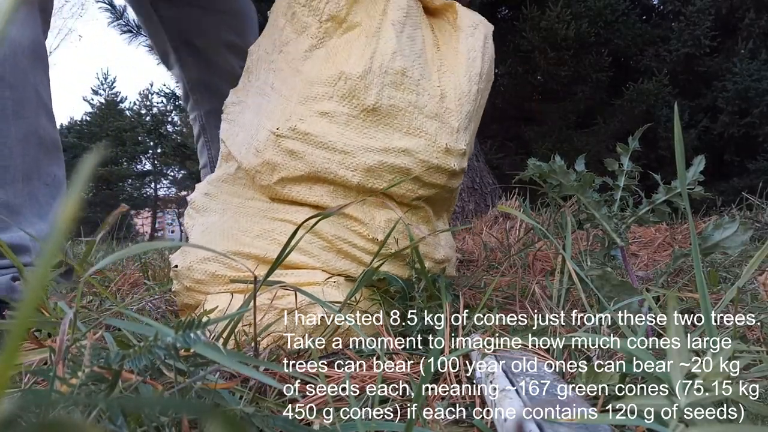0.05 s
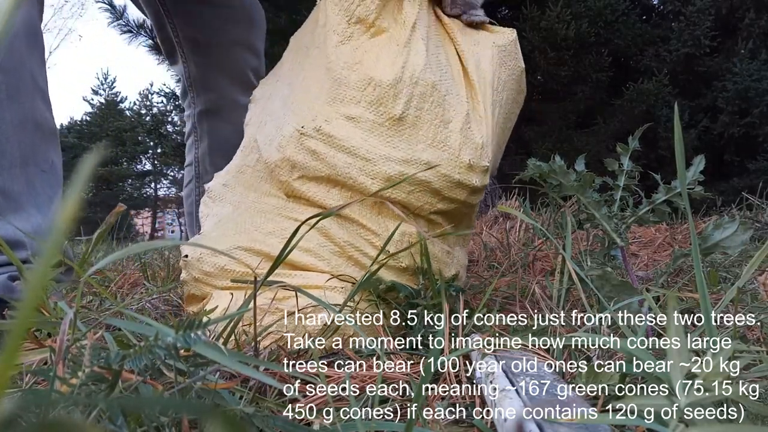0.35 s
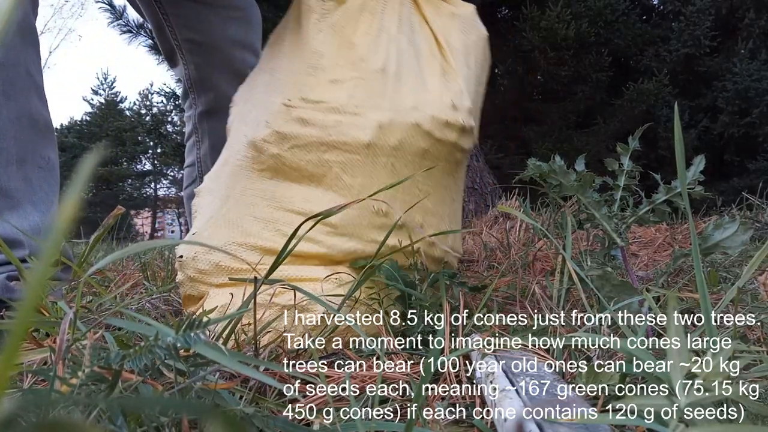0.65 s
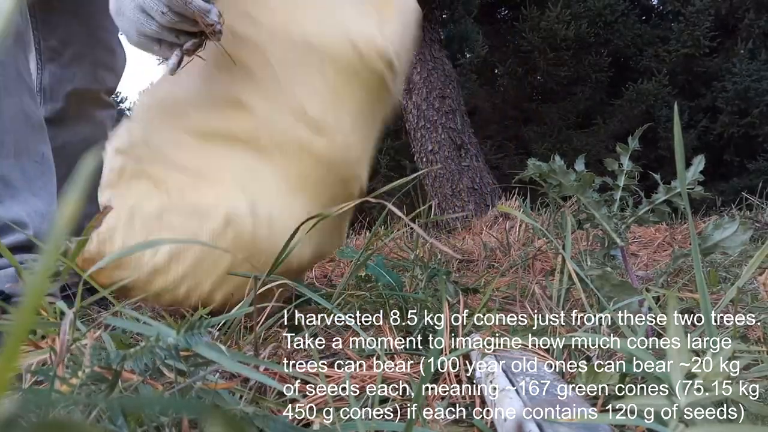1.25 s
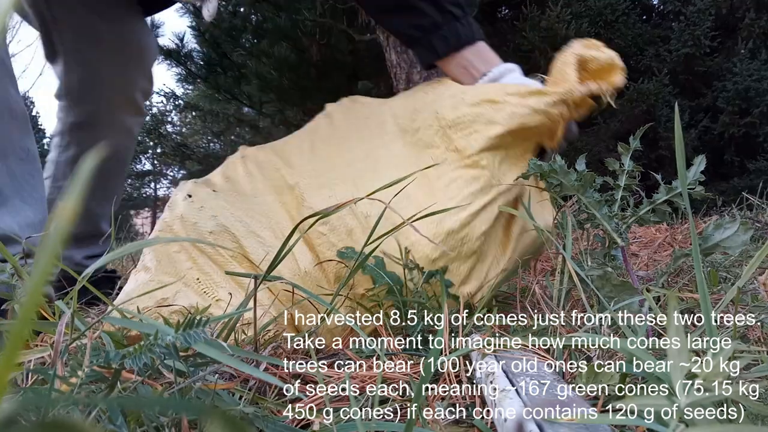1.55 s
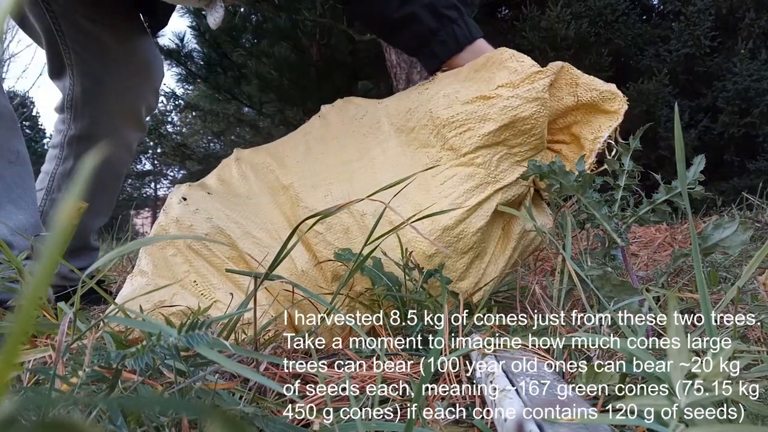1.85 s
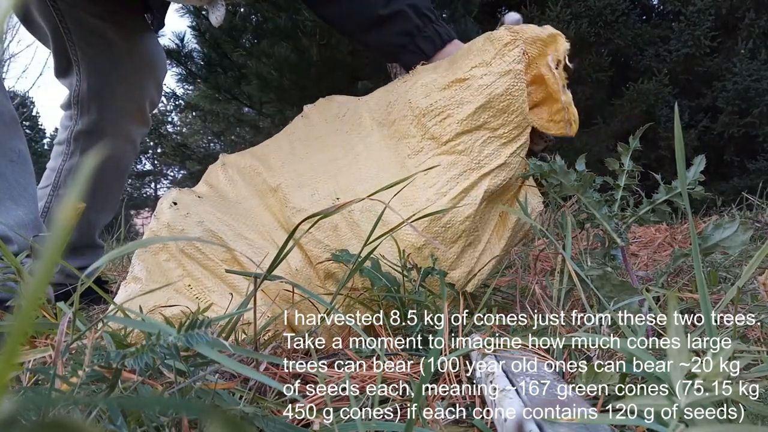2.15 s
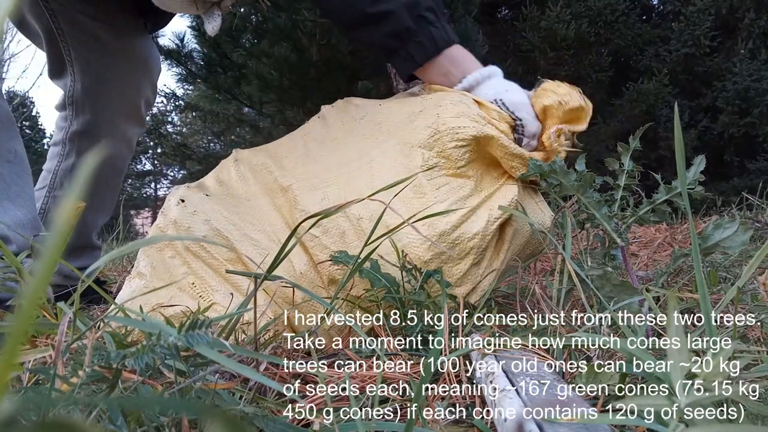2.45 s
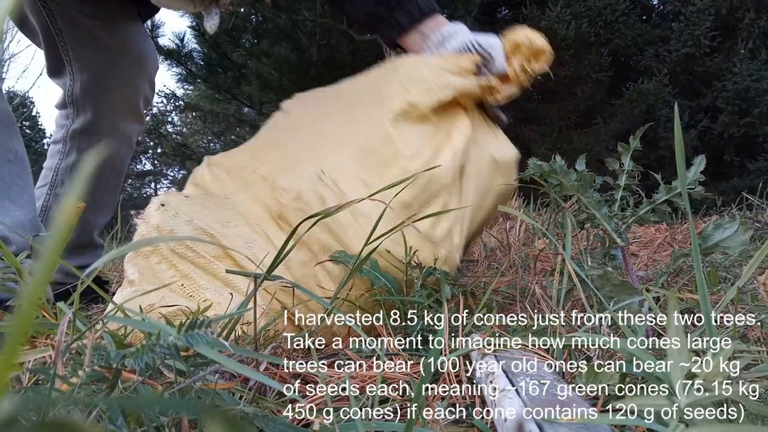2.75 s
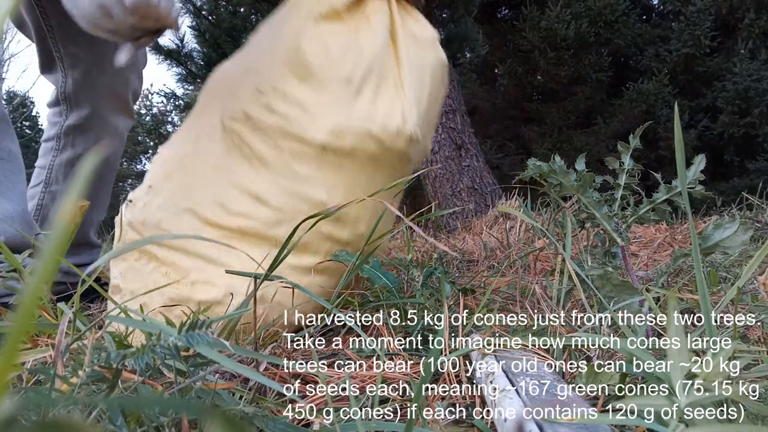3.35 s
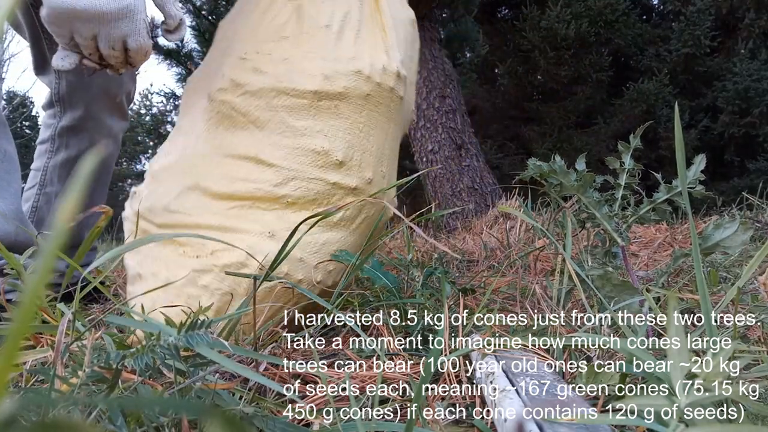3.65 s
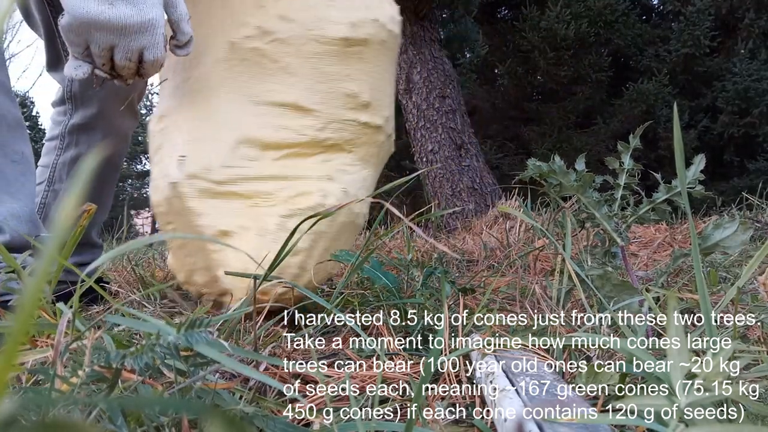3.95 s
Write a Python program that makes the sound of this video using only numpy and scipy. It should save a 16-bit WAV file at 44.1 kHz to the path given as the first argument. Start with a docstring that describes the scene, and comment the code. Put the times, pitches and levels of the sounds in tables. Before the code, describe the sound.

Close, uneven rustling of a coarse sack being hauled about outdoors, its stiff folds snapping. The cones inside grind and knock as it rises, lands softly on the turf, then is handled and heaved up once more.

```python
"""A woven sack full of conifer cones is hauled up, dropped on the grass and hauled up again, close by.
Stick-slip friction makes the weave rasp and scrape, and its folds crinkle and snap as they buckle.
Inside, the cones grind, crunch at each heave and knock together in heavily damped impacts.
The load thuds softly on the turf; a short scatter and faint outdoor air lie underneath."""
import sys
import numpy as np
from scipy import signal
from scipy.fft import rfft, irfft
from scipy.io import wavfile

SR = 44100
rng = np.random.default_rng(int(sys.argv[2]) if len(sys.argv) > 2 else 0)


def transcribe(u):
    """Save the signal u as a 16-bit wav file named by the first command-line argument.

    u: samples, shape (n,) or (channels, n), limited to [-1, 1]; the rate is SR.
    q: integer samples, one column per channel.
    """
    v = np.clip(np.atleast_2d(u).T, -1, 1)
    q = np.round(v * 32767).astype(np.int16)
    wavfile.write(sys.argv[1], SR, q)


N = 176400

# Cloth rubbing, cloth scraping over cones and grass, and cones shifting inside.
# Each row: time in seconds, relative level in dB.
RUBBING = [(0, -42), (.37, -42.5), (.41, -45.5), (.445, -39), (.52, -46), (.57, -48.5), (.62, -42),
           (.79, -40.5), (.9, -44.5), (.98, -43), (1.1, -54), (1.2, -53), (1.25, -55), (1.34, -47.5),
           (1.45, -43), (1.58, -46), (1.69, -43.5), (1.83, -45), (1.88, -51.5), (1.92, -45.5), (2.0, -56),
           (2.06, -43.5), (2.17, -49.5), (2.36, -57.5), (2.44, -37), (2.48, -44.5), (2.53, -39.5),
           (2.565, -48), (2.63, -42), (2.73, -46.5), (2.83, -45), (2.97, -43), (3.12, -56), (3.19, -51),
           (3.24, -59), (3.38, -43.5), (3.47, -41.5), (3.57, -39), (3.62, -58), (3.66, -49.5), (3.76, -51),
           (3.84, -42.5), (3.92, -46.5), (4, -53.5)]
SCRAPING = [(0, -51.5), (.16, -50), (.38, -51.5), (.42, -52.5), (.47, -54), (.55, -57.5), (.66, -49),
            (.79, -51), (.9, -51.5), (.99, -54), (1.09, -60), (1.16, -52), (1.22, -68), (1.25, -70),
            (1.38, -60), (1.46, -49), (1.58, -53), (1.7, -53.5), (1.82, -64), (1.88, -66), (2.0, -70),
            (2.09, -64.5), (2.2, -70), (2.36, -70), (2.45, -58), (2.53, -50), (2.58, -60.5), (2.64, -55),
            (2.72, -59), (2.86, -53.5), (2.98, -50.5), (3.06, -70.5), (3.17, -71), (3.26, -72),
            (3.33, -64.5), (3.41, -52), (3.47, -47.5), (3.56, -43.5), (3.63, -73.5), (3.75, -61),
            (3.84, -52), (3.93, -55.5), (4, -64)]
SHIFTING = [(0, -54.5), (.08, -76), (.16, -55), (.42, -60), (.475, -53.5), (.53, -72), (.67, -59),
            (.78, -44.5), (.9, -52.5), (.98, -45), (1.07, -54), (1.17, -59), (1.215, -55), (1.26, -69.5),
            (1.39, -63.5), (1.44, -44.5), (1.57, -48.5), (1.70, -49.5), (1.80, -64), (1.835, -54.5),
            (1.88, -68.5), (2.2, -65.5), (2.41, -83), (2.45, -57), (2.6, -58), (2.75, -52.5), (2.84, -54.5),
            (2.98, -43.5), (3.05, -61.5), (3.17, -55.5), (3.33, -64), (3.4, -48), (3.48, -47.5),
            (3.56, -44), (3.63, -61.5), (3.76, -62), (3.81, -45), (3.9, -56), (3.96, -57), (4, -57)]
# Heaves of the load. Each row: start and length in seconds, relative cloth and cone levels in dB.
HEAVES = [(0.818, 0.035, -31, -42.5), (1.47, 0.055, -34.5, -36.5), (3.5, 0.03, -32.5, -45)]
# Stiff creases snapping. Each row: start in seconds, relative peak level in dB.
SNAPS = [(0.2352, -19.5), (0.2622, -22), (.5702, -24), (.8, -19), (.822, -19), (0.951, -23.5),
         (1.0663, -31.5), (1.141, -35), (1.4325, -30), (1.541, -19), (1.888, -26), (1.9543, -30),
         (2.049, -25), (2.1912, -47), (2.2846, -35), (2.2873, -30.5), (2.313, -40), (2.3387, -29.5),
         (2.5871, -25.5), (2.596, -23), (2.6452, -22), (2.689, -32), (2.7212, -27.5), (2.817, -31),
         (2.8253, -22), (2.8732, -25), (2.9138, -23.5), (3.046, -25.5), (3.3025, -26), (3.3564, -19),
         (3.511, -12), (3.6077, -25), (3.7854, -29), (3.827, -26), (3.919, -43)]
# Scales catching on cloth. Each row: start in seconds, level in dB, length in seconds, resonance in Hz.
CATCHES = [(0.46, -50, 0.013, 700), (0.826, -46, .008, 1430), (1.189, -54, 0.035, 1090),
           (1.487, -46.5, 0.033, 1033), (1.5405, -38.5, 0.0015, 2380), (1.829, -48, 0.0081, 2540),
           (2.438, -54.5, 0.033, 480), (2.963, -52, 0.005, 2600), (3.155, -61, .03, 1150),
           (3.512, -37, 0.0045, 2760), (3.885, -51.5, 0.0073, 2700)]
# Cones colliding. Each row: start in seconds, relative level in dB, nominal pitch in Hz.
KNOCKS = [(0.4622, -30.5, 580), (0.775, -32.5, 457), (.8222, -20.5, 507), (.857, -22, 615),
          (.9566, -31.5, 540), (1.1955, -36, 720), (1.2093, -36.5, 790), (1.428, -44, 640),
          (1.4816, -38, 513), (1.514, -29, 775), (1.5405, -28.5, 680), (1.6693, -31, 600),
          (1.721, -32, 671.4), (2.7392, -32, 648), (2.9803, -29.5, 377), (3.406, -35.5, 680),
          (3.5107, -40, 720), (3.7865, -24.5, 339), (3.8497, -23.5, 475), (3.9375, -27.5, 593),
          (3.9432, -18, 570)]
# Modes of a cone. Each row: ratio to the pitch, relative level in dB, 60 dB decay time in seconds.
CONE_MODES = [(1.023, 6.5, 0.0069), (0.742, -0.5, 0.011), (1.64, -11, 0.0079)]
# Weight pressing on the turf. Each row: start in seconds, level in dB, length in seconds.
THUDS = [(0, -62, 0.077), (0.166, -67.5, 0.22), (0.479, -68, 0.029), (0.829, -50, 0.022),
         (1.051, -88, 0.047), (1.477, -57, 0.079), (2.99, -65, 0.031), (3.522, -60.5, 0.049)]
# Spectral envelopes of the sources. Each row: frequency in Hz, relative gain in dB.
WEAVE_SPECTRUM = [(100, -31), (800, -23), (1800, -34), (2400, -1.5), (3100, -2), (4200, 2), (6000, -0.5),
                  (8000, -2), (10000, -0.5), (12000, -5), (16000, 2.5)]
SCRAPE_SPECTRUM = [(100, -29), (500, -7.5), (1100, -5.5), (1700, -1.5), (2400, 3), (3600, -1), (5500, -8.5),
                   (9000, -5), (16000, -8)]
SNAP_SPECTRUM = [(100, -48), (1200, -25), (2500, -9.5), (4000, 0), (7500, -2.5), (10000, -1.5),
                 (12500, -5.5), (16000, -2)]
GRIND_SPECTRUM = [(30, -28), (70, -31.5), (120, -20), (220, -11), (330, -1.5), (460, 4.5), (680, 0),
                  (850, -1.5), (1200, -7.5), (1700, -16.5), (3000, -54), (8000, -35)]
THUD_SPECTRUM = [(25, -19.5), (70, -30), (120, -5), (220, 1), (330, 3.5), (600, -22), (3000, -75)]
AIR_SPECTRUM = [(20, -49), (60, -4), (130, 6), (400, 13), (900, 5.5), (2000, -29.5), (8000, -10),
                (16000, 7)]

WEAVE_DB, CRINKLE_DB, SCRAPE_DB, SNAP_DB, GRIND_DB, KNOCK_DB, AIR_DB = -1, -4.5, -1, -2.5, -4, 3, -67
CLUMP_HZ, CLUMP_LIMIT_DB = 79, -32  # clumps of slips merge when the cloth rubs harder than this
REST_DB, CRINKLE_SLOPE = -47, 0.69  # dB of crinkle per dB of rubbing, about REST_DB


def sack(rub_db, scrape_db):
    """Stick-slip friction: threads slip in clumps, folds crinkle, and loaded cloth scrapes."""
    loose = 1 / np.hypot(1, amp(rub_db - CLUMP_LIMIT_DB))
    clumps = wander(rate_hz=CLUMP_HZ) * loose
    rub_db = rub_db + 1.4 * wander(rate_hz=23) * loose
    threads = clicks(per_s=8400, spread_db=4.0, cap=3.47) * amp(1.45 * clumps)
    weave = unit(mic_resonance(colour(threads, WEAVE_SPECTRUM))) * amp(rub_db + WEAVE_DB)
    buckles = clicks(per_s=470, spread_db=4.5, cap=3.5) * amp(1.7 * clumps)
    folds = grains(buckles, 3150, 11900, cycles=3.6)
    crinkle_db = REST_DB + CRINKLE_SLOPE * (rub_db - REST_DB) + CRINKLE_DB
    crinkle = unit(mic_resonance(colour(folds, WEAVE_SPECTRUM))) * amp(crinkle_db) * loose
    slips = clicks(per_s=2400, spread_db=3.0) * amp(3.1 * clumps)
    scrape = unit(fold_reflection(colour(slips, SCRAPE_SPECTRUM))) * amp(scrape_db + SCRAPE_DB)
    return weave + crinkle + scrape


def fold_reflection(x, delay_s=.0024, sway=0.124, share=0.5):
    """Interference with a reflection off the moving cloth forms a drifting comb filter."""
    n = np.arange(N)
    lag = SR * delay_s * (1 + sway * wander(rate_hz=2.82))
    return x + share * np.interp(n - lag, n, x)


def hauling_levels(scrape_offset_db=-9):
    """Incoherent powers add: each heave raises the rubbing, scraping and shifting levels, in dB."""
    power = amp([curve(RUBBING), curve(SCRAPING), curve(SHIFTING)]) ** 2
    for start, length, cloth_db, cones_db in HEAVES:
        gains = amp([cloth_db, cloth_db + scrape_offset_db, cones_db])
        power += np.outer(gains, surge(start, length, rise_s=.003, fall_s=.011)) ** 2
    return 10 * np.log10(power)


def crease_snaps(decay_s=0.00094):
    """Buckling: a stiff crease gives way in a sharp burst of noise."""
    t, out = np.arange(SR // 50) / SR, np.zeros(N)
    for start, db in SNAPS:
        burst = rng.standard_normal(len(t)) * np.exp(-t / decay_s)
        snap = mic_resonance(colour(burst, SNAP_SPECTRUM))
        add(out, start, amp(db + SNAP_DB) * snap / abs(snap).max())
    return out


def scale_catches(q=3.5, ring_db=7, fall_s=.002):
    """Friction excites one broad resonance as a cone scale drags along the cloth."""
    t, out = np.arange(SR // 10) / SR, np.zeros(N)
    for start, db, length, hz in CATCHES:
        rasp = colour(rng.standard_normal(len(t)), SCRAPE_SPECTRUM)
        ring = amp(ring_db) * signal.lfilter(*signal.iirpeak(hz, q, SR), rasp)
        envelope = np.exp(-np.maximum(t - length, 0) / fall_s)
        add(out, start, amp(db) * unit(rasp + ring) * envelope)
    return out


def cone_grinding(shift_db):
    """Superposition: many small muffled impacts of cone on cone merge into a grind."""
    bumps = grains(clicks(per_s=700, spread_db=1.5), 135.13, 1597, cycles=2.9)
    return unit(colour(bumps, GRIND_SPECTRUM)) * amp(shift_db + GRIND_DB)


def cone_knocks(rise_cycles=0.58):
    """An impact excites a cone's damped modes, which die within a few cycles."""
    t, out = np.arange(SR // 20) / SR, np.zeros(N)
    for start, db, hz in KNOCKS:
        ring = sum(amp(level - 60 * t / t60) * np.sin(2 * np.pi * hz * ratio * t)
                   for ratio, level, t60 in CONE_MODES)
        attack = 1 - np.exp(-(t * hz / rise_cycles) ** 2)
        low_cut = signal.butter(3, hz * 0.72, "high", fs=SR)  # a cone hardly radiates below this
        add(out, start, -amp(db + KNOCK_DB) * signal.lfilter(*low_cut, ring * attack))
    return out


def turf_thuds():
    """Soft contact favours low frequencies: the load rumbles as it presses on the turf."""
    envelope = sum(amp(db) * surge(start, length, rise_s=0.0057, fall_s=0.022)
                   for start, db, length in THUDS)
    return envelope * unit(colour(rng.standard_normal(N), THUD_SPECTRUM))


def scatter(x, echo_db=-12, t60_s=0.18):
    """Scattering from ground and trees adds a short, faint tail."""
    t = np.arange(SR // 2) / SR
    tail = rng.standard_normal(len(t)) * amp(-60 * t / t60_s) * (t > .003)
    return x + amp(echo_db) * signal.fftconvolve(x, tail / np.linalg.norm(tail))[:N]


def outdoor_air():
    """Stationary coloured noise forms the faint ambient floor."""
    return amp(AIR_DB) * unit(colour(rng.standard_normal(N), AIR_SPECTRUM))


def mic_resonance(x, hz=7624, width_hz=765, gain_db=12.5):
    """The microphone's resonance lifts a narrow band of treble."""
    b, a = signal.iirpeak(hz, hz / width_hz, SR)
    return x + amp(gain_db) * signal.lfilter(b, a, x)


def clicks(per_s, spread_db, cap=3.4):
    """A Poisson process of clicks of either sign, most small and a few large."""
    size = amp(spread_db * np.minimum(rng.exponential(1, N), cap))
    return size * rng.choice([-1, 1], N) * (rng.random(N) < per_s / SR)


def grains(train, low_hz, high_hz, cycles, count=24):
    """Impulse response: each click rings one of many small, heavily damped spots."""
    spot, t, out = rng.integers(0, count, N), np.arange(count * 50) / SR, np.zeros(N)
    for k, hz in enumerate(np.geomspace(low_hz, high_hz, count)):
        ring = np.cos(2 * np.pi * hz * t) * np.exp(-t * hz / cycles)
        out += signal.oaconvolve(train * (spot == k), ring * hz)[:N]
    return out


def colour(x, spectrum, size=2048):
    """A minimum-phase filter imposes the spectrum, so clicks keep their attack."""
    hz, db = np.transpose(spectrum)
    bin_hz = abs(np.fft.fftfreq(size, 1 / SR))
    log_gain = np.log(amp(np.interp(np.log(bin_hz + 1), np.log(hz), db)))
    taps = np.fft.ifft(np.exp(np.conj(signal.hilbert(log_gain)))).real
    return signal.fftconvolve(x, taps)[:len(x)]


def wander(rate_hz):
    """Band-pass noise gives slow random motion of rms 1."""
    ratio = np.fft.rfftfreq(N, 1 / SR) / rate_hz
    return unit(irfft(rfft(rng.standard_normal(N)) * ratio / (1 + ratio ** 3), N))


def surge(start, length, rise_s, fall_s):
    """Exponential growth, a plateau and exponential decay."""
    t = np.arange(N) / SR - start
    return np.exp(np.minimum(t, 0) / rise_s - np.maximum(t - length, 0) / fall_s)


def curve(points):
    """Linear interpolation of (time, value) rows."""
    return np.interp(np.arange(N) / SR, *np.transpose(points))


def amp(db):
    """Decibels to amplitude ratio."""
    return 10 ** (np.asarray(db) / 20)


def unit(x):
    """Normalisation to rms 1."""
    return x / np.sqrt(np.mean(x ** 2) + 1e-20)


def add(mix, start_s, sound):
    """Superposes a sound on the mix."""
    part = mix[round(start_s * SR):][:len(sound)]
    part += sound[:len(part)]


def scene():
    """Sound pressures add: cloth, cones, their scatter and the outdoor air."""
    rub_db, scrape_db, shift_db = hauling_levels()
    cloth = sack(rub_db, scrape_db) + crease_snaps() + scale_catches()
    cones = cone_grinding(shift_db) + cone_knocks() + turf_thuds()
    return (scatter(cloth + cones) + outdoor_air())[None]


def record(dry):
    """A linear-phase low-pass filter limits the bandwidth."""
    low_pass = signal.firwin(511, 15950, window=("kaiser", 9), fs=SR)
    return signal.oaconvolve(dry, low_pass[None], "same")


dry = scene()
out = record(dry)
transcribe(out)
```